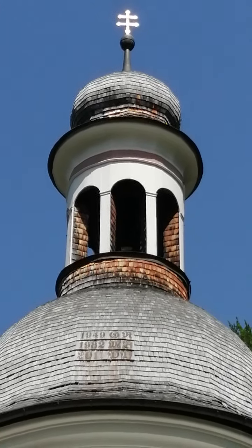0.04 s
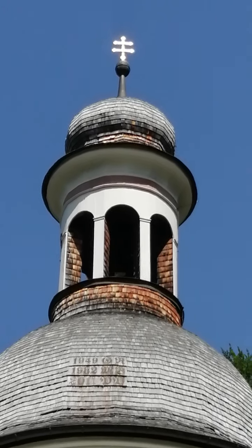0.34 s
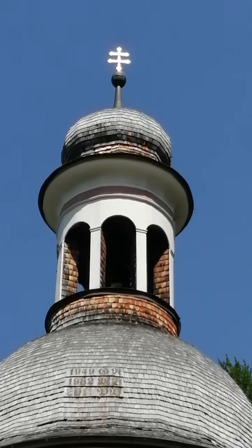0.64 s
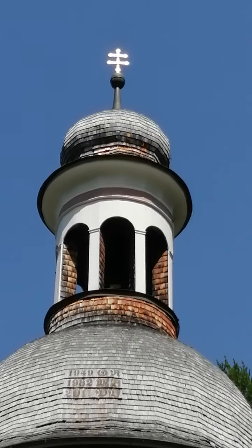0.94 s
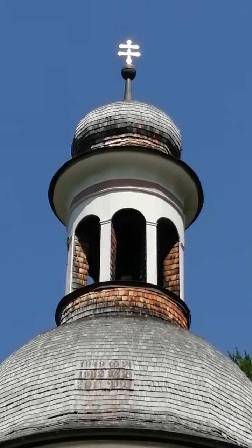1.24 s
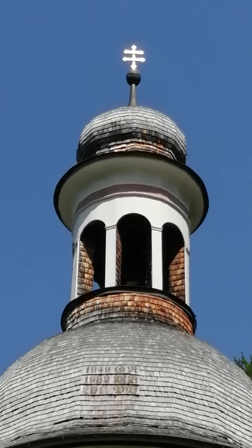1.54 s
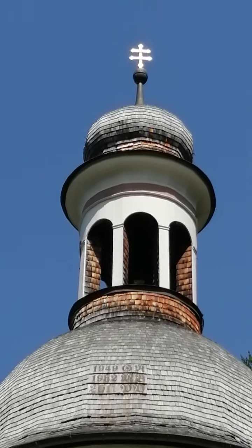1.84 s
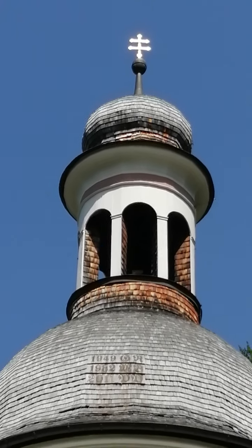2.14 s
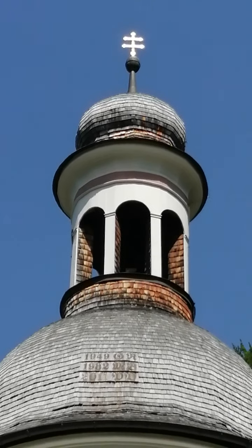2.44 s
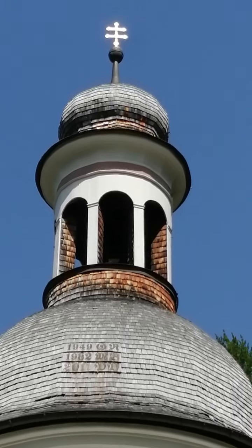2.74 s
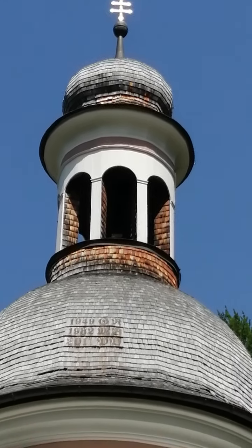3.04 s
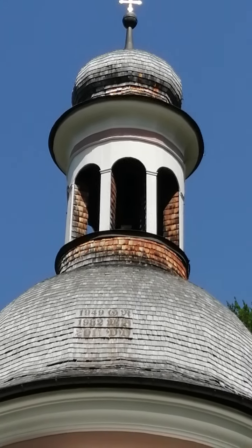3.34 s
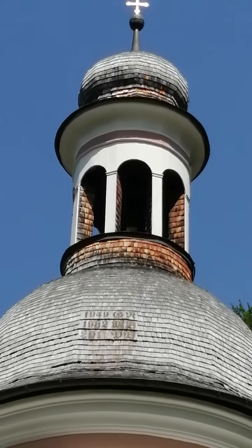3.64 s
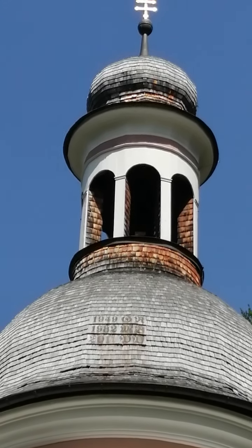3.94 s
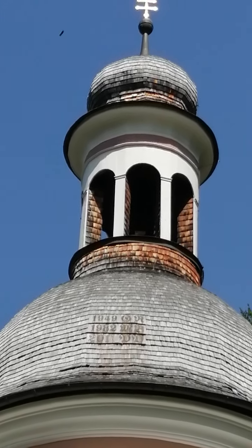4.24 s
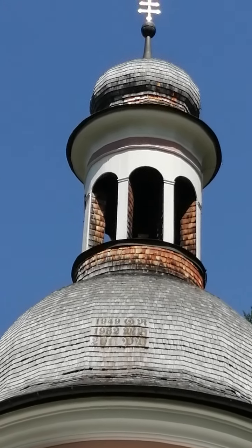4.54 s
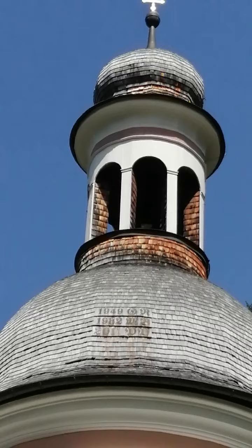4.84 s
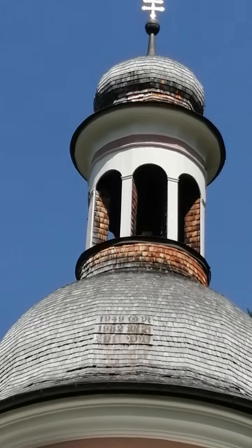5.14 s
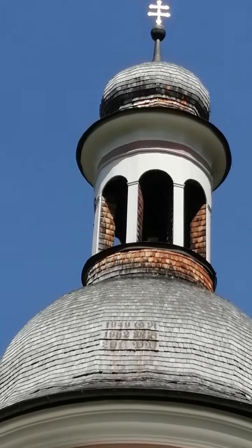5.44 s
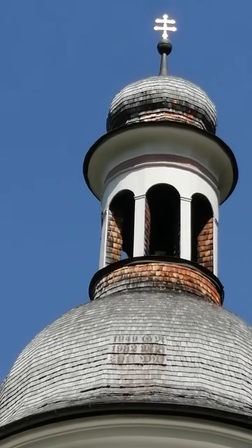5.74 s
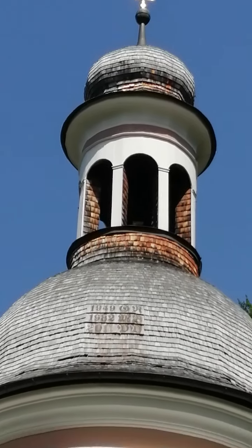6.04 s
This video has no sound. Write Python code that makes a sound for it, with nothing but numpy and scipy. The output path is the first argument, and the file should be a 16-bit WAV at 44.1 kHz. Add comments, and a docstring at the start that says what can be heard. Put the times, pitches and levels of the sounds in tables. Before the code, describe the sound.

A small bronze bell is already ringing at the start, swinging in the open turret of a chapel and heard outdoors from the ground. The clapper strikes at about 0.8, 1.5, 2.4, 3.2, 4.2, 4.9 and 5.9 seconds, in a steady, slightly limping rhythm. Each stroke has a short metallic clank, a bright shimmer that dies quickly and a clang that lasts into the next hit. Alternate strokes are a little duller, and the one at 0.8 seconds is softer. Lower tones hum throughout, swelling and dipping with the swing, while the motion and wall echoes make the ring waver and flutter. The mounting ticks very faintly near 0.1, 1.8 and 5.3 seconds. A faint rumble and hiss of open air lies underneath. The bell is still ringing at the end, around 6 seconds.

```python
"""A small bronze bell is already ringing, swinging in the open lantern of a chapel, heard from the ground.
The clapper hits at both ends of the swing: a clank, a bright shimmer and a clang over three lasting low partials.
As the bell moves, its partials bend in pitch and sweep their lobes past the listener, and echoes from
the lantern walls, each bent by another amount, make them flutter.
The hanging ticks now and then, and the faint air of a quiet day lies underneath."""
import sys
import numpy as np
from scipy import signal
from scipy.fft import rfft, irfft, next_fast_len
from scipy.io import wavfile
from scipy.ndimage import uniform_filter1d

SR = 44100
rng = np.random.default_rng(int(sys.argv[2]) if len(sys.argv) > 2 else 0)


def unload_audio(sound):
    """Save the sound as a 16-bit wav file, at the path given as the first command line argument."""
    columns = np.transpose(np.atleast_2d(sound))
    # keep every value between -1 and 1, then stretch to whole-number steps
    steps = np.round(np.clip(columns, -1, 1) * 32767)
    wavfile.write(sys.argv[1], SR, steps.astype(np.int16))


N = 268569
LEAD_S, SPAN_S, CONTROL_HZ = .2, 6.4, 1000  # the partials' envelopes: pre-roll, length, sample rate


def undb(db):
    """Decibels to gain."""
    return 10 ** (np.asarray(db) / 20)


def at_hz(hz, table, column=1):
    """One column of a table, read on a log-frequency axis."""
    table = np.array(table)
    return np.interp(np.log(np.maximum(hz, 1)), np.log(table[:, 0]), table[:, column])


def noise(density_db, size, apart_hz):
    """Stereo noise shaped by a curve in dB per Hz; the image widens towards the treble."""
    hz = np.fft.rfftfreq(size, 1 / SR)
    mid, side = rfft(rng.standard_normal((2, size))) * undb(density_db(hz)) * np.sqrt(SR / 2)
    side = side * np.clip(np.sqrt(hz / apart_hz), .22, .75)
    return irfft([mid + side, mid - side], size)


def add(out, start_s, sound):
    """Mix a sound in from start_s."""
    start = int(start_s * SR)
    lo, hi = max(start, 0), min(start + sound.shape[-1], N)
    if hi > lo:
        out[:, lo:hi] += sound[:, lo - start:hi - start]


def ears(db, lead=0):
    """Pan as complex gains: the left ear is db louder and lead radians ahead."""
    sign = np.array([[1], [-1]])
    gains = undb(sign * db / 2) * np.exp(1j * sign * lead / 2)
    return gains / abs(gains.mean())


def tones(voices):
    """Sum of sines from (Hz, complex envelope per ear): each envelope's spectrum moves up to its pitch."""
    size = round(SPAN_S * SR)
    spectrum = np.zeros((2, size // 2 + 1), complex)
    for hz, envelope in voices:
        count = envelope.shape[1]
        bins = round(hz * SPAN_S) + np.arange(count) - count // 2
        sidebands = np.fft.fftshift(np.fft.fft(envelope), axes=1) * size / count / np.sqrt(2)
        spectrum[:, bins[bins > 0]] += sidebands[:, bins > 0]
    return irfft(spectrum, size)[:, round(LEAD_S * SR):][:, :N]


# The bed of open air. Each row: frequency in Hz, level in dB per Hz.
AIR_SPECTRUM = [(20, -87), (60, -77), (100, -81), (140, -89), (300, -86), (700, -88), (1200, -92),
                (2500, -102), (4000, -113), (7300, -109), (8600, -122), (15000, -124)]


def air():
    """Faint outdoor rumble and hiss."""
    return noise(lambda hz: at_hz(hz, AIR_SPECTRUM), next_fast_len(N), apart_hz=2500)[:, :N]


# Ticks as the bell starts back. Each row: start in seconds, level in dB.
HANGING_TICKS = [(.11, -52), (1.83, -52), (5.305, -53)]


def hanging_ticks(t60=.12, top_hz=7000, size=8192):
    """Small dry knocks from the bell's hanging."""
    out = np.zeros((2, N))
    fade_db = -60 * np.arange(size) / SR / t60
    for start_s, db in HANGING_TICKS:
        knock = noise(lambda hz: -6 * (hz / top_hz) ** 4 - 9 * np.exp(-hz / 1500), size, apart_hz=3000)
        add(out, start_s, knock / knock.std() * undb(db + fade_db))
    return out


# The pace of the swing. Each entry: a time in seconds when the bell stands at the far end.
FAR_TURNS_S = [-.13, 1.583, 3.298, 5.04, 6.77]


def swing_share(t):
    """How far the bell is through its swing: 0 at the far end, .5 at the near end, 1 back again."""
    return np.interp(t, FAR_TURNS_S, np.arange(len(FAR_TURNS_S))) % 1


def swing(t):
    """Position of the bell: +1 at the far end, -1 at the near end."""
    return np.cos(2 * np.pi * swing_share(t))


def facing(lobes, t):
    """Gain as the mouth turns its lobes past the listener; a change of sign passes through silence."""
    return np.interp(swing_share(t), *np.transpose(lobes), period=1)


def waver(t, per_s, width=.4):
    """Random complex gain that glides between steps, a little different at each ear."""
    hold = max(int(CONTROL_HZ / per_s), 1)
    step_index = ((t - t[0]) * min(per_s, CONTROL_HZ / 2)).astype(int)
    steps = rng.standard_normal((2, 2, len(t)))[..., step_index]
    real, imag = uniform_filter1d(uniform_filter1d(steps, hold), hold)
    mid, side = (real + 1j * imag) / np.sqrt(np.mean(real ** 2 + imag ** 2))
    return np.array([mid + width * side, mid - width * side])


def lantern_echoes(hz, position, echo_db, reach_m, ear_lag_ms, spread=1.6, count=20):
    """Direct sound plus wall echoes: a partial's complex gain at each ear for each bell position."""
    bend = -2 * np.pi * hz * reach_m * position / 343  # the moving bell shifts the phase, so the pitch
    # each wall sees the bell move at its own speed, and sends its echo from its own direction
    speeds = np.linspace(-.7 * spread, spread, count)
    lag_s = ear_lag_ms / 1000 * rng.standard_normal(count)
    walls = np.exp(2j * np.pi * (rng.random(count) + hz * np.array([lag_s, -lag_s]) / 2))
    echoes = (walls[:, :, None] * np.exp(1j * speeds[:, None] * bend)).sum(axis=1)
    field = np.exp(1j * bend) + undb(echo_db) / np.sqrt(count) * echoes
    power = np.mean(abs(field) ** 2, axis=0)
    return field / np.sqrt(uniform_filter1d(power, size=len(position) // 5))


def paths(hz, t, echo_db, reach_m=.62, ear_lag_ms=.11, sway=.15, sway_s=1.3):
    """Flutter of a partial swung reach_m to either side, heard through lantern and late ground echoes."""
    positions = np.linspace(-1 - sway, 1 + sway, 260)
    field = lantern_echoes(hz, positions, echo_db, reach_m, ear_lag_ms)
    course = swing(t) + sway * np.sin(2 * np.pi * (t / sway_s + rng.random()))  # no two swings alike
    early = np.array([np.interp(course, positions, ear) for ear in field])
    # late echoes from the grounds waver, with a fainter tremble on top; they grow up to 4 kHz
    late = waver(t, per_s=28 * hz / 2000) + undb(-11) * waver(t, per_s=110)
    late_gain = undb(-9.5 + 3.5 * min(np.log2(hz / 2000), 1))
    return (early + late_gain * late) / np.hypot(1, late_gain)


def bluntness(hz, stroke_s, shelf_db=-5, shelf_hz=10500):
    """Treble shelf in dB: at the far end of the swing the clapper lands on a blunter face."""
    return shelf_db * (swing(stroke_s) > 0) / (1 + (shelf_hz / hz) ** 12)


# The clapper's strokes. Each row: start in seconds, ring strength in dB, ring tilt in dB per octave,
# clank strength in dB, clank tilt above 2 kHz in dB per octave.
CLAPPER_STROKES = [(-1, -2, 0, 0, 0), (-.2, .8, .4, 0, 0), (.849, -3, -4.5, -1, -4),
                   (1.5135, 1.5, -1, -2, -2), (2.428, -.7, .2, -.7, .3), (3.223, 1.3, -.9, -1, -2),
                   (4.18, -.3, 0, 1, .6), (4.945, 1.8, -.3, -.5, -1.3), (5.889, -1, -.2, 1, .6)]


def ringing(hz, t60, t, rise_s=.007):
    """Envelope of one mode: each stroke adds energy, with its own brightness, and the energy drains."""
    stroke_s, db, tilt_db, *_ = np.transpose(CLAPPER_STROKES)
    decay_per_s = 2 * np.log(1000) / t60
    power = undb(db + tilt_db * np.log2(hz / 1000) + bluntness(hz, stroke_s)) ** 2
    start_s = np.maximum(stroke_s, t[0])  # earlier strokes come in already faded
    power = power * np.exp(-decay_per_s * (start_s - stroke_s))
    blows = np.bincount(np.searchsorted(t, start_s), power, len(t))
    energy = signal.lfilter([1], [1, -np.exp(-decay_per_s / CONTROL_HZ)], blows)
    smooth = np.exp(-1 / (rise_s * CONTROL_HZ))
    return signal.lfilter([1 - smooth], [1, -smooth], np.sqrt(energy))


# The clank's colour. Each row: frequency in Hz, base level in dB per Hz, 60 dB decay in seconds.
CLANK_SPECTRUM = [(60, -80, .4), (150, -74, .5), (400, -78, .4), (800, -70, .3), (1400, -61, .27),
                  (2500, -68, .27), (5000, -72, .26), (7300, -73, .26), (8800, -85, .13), (15000, -98, .11)]


def clank(crack_db=7, crack_s=.009, rise_s=.002, size=16384, bands=10):
    """Iron meets bronze: a short crack, then a wash that dies in the lantern."""
    out, age = np.zeros((2, N)), np.arange(size) / SR
    log_centres, step = np.linspace(np.log(60), np.log(15000), bands, retstep=True)
    log_hz = np.log(np.maximum(np.fft.rfftfreq(size, 1 / SR), 1))
    attack = (1 + undb(crack_db) * np.exp(-age / crack_s)) * (1 - np.exp(-age / rise_s))
    for start_s, _, _, db, tilt_db in CLAPPER_STROKES:
        burst = rfft(noise(lambda hz: at_hz(hz, CLANK_SPECTRUM), size, apart_hz=3500))
        for hz in np.exp(log_centres):
            band = irfft(burst * np.maximum(1 - abs(log_hz - np.log(hz)) / step, 0))
            fade = np.exp(-np.log(1000) * age / at_hz(hz, CLANK_SPECTRUM, column=2))
            gain = undb(db + tilt_db * np.log2(max(hz / 2000, 1)) + bluntness(hz, start_s))
            add(out, start_s, band * attack * fade * gain)
    return out


# The sheen on top. Each row: frequency in Hz, base level of one mode in dB, 60 dB decay in seconds.
SHIMMER_SPECTRUM = [(3500, -63, .9), (4500, -57, .8), (6000, -54, .55), (7300, -50, .65), (8000, -56, .5),
                    (9000, -61, .5), (11000, -68, .42), (15000, -77, .35)]


def shimmer(t, scatter_db=6, count=64):
    """A crowd of faint, closely spaced high modes that die quickly after each stroke."""
    for hz in np.linspace(3900, 14500, count) + rng.uniform(-70, 70, count):
        level = undb(at_hz(hz, SHIMMER_SPECTRUM) + scatter_db * rng.uniform(-1, 1))
        ring = ringing(hz, at_hz(hz, SHIMMER_SPECTRUM, column=2), t)
        lean_left = ears(db=12 * np.exp(-((hz - 8800) / 2200) ** 2))
        yield hz, level * ring * paths(hz, t, echo_db=2.5) * lean_left


# The clang. Each row: pitch in Hz, base level in dB, 60 dB decay in seconds, lobe turn from
# mid-swing to either end in radians, lobe aim in radians, left minus right in dB.
CLANG_PARTIALS = [(980, -50, 3.4, 1.7, 0.3, -3), (1608, -36, 2.0, 1.6, -0.3, -5),
                  (1650, -42, 1.3, 1.8, -0.5, -3), (2061, -36, 2.7, 1.8, -0.1, -5),
                  (2196, -52, 0.7, 2.2, 1.1, 1), (2298, -37, 2.0, 1.7, 2.3, -4),
                  (2402, -48, 1.8, 0.9, 0.7, -6), (2618, -33, 3.3, 1.0, 0.1, -1),
                  (2675, -45, 1.9, 1.0, -0.1, -2), (2789, -37, 1.7, 1.3, -0.3, -2),
                  (2863, -37, 0.7, 2.7, 1.4, -7), (2941, -53, 1.6, 3.0, 1.7, -3),
                  (3014, -48, 0.6, 1.7, -2.2, 0), (3283, -54, 1.3, 1.9, -0.2, 3),
                  (3380, -33, 2.4, 2.1, -0.2, 5), (3531, -43, 0.9, 0.4, 1.9, -8),
                  (3585, -47, 0.8, 1.1, -1.2, -5), (3660, -49, 0.9, 1.5, -0.2, -1),
                  (3746, -51, 0.8, 1.1, -1.1, 1), (4026, -49, 1.0, 2.8, -1.5, -3),
                  (4178, -36, 1.7, 0.8, -0.3, -3), (4983, -34, 1.7, 0.8, -0.2, -5),
                  (5211, -47, 0.7, 1.5, 0.1, -1), (5286, -43, 1.1, 0.3, 1.4, 0),
                  (5775, -33, 0.6, 1.0, -0.2, 0), (6560, -33, 1.0, 1.9, -0.1, -2),
                  (7110, -38, 0.7, 2.8, 1.6, 3), (7330, -38, 0.9, 0.9, 0.1, 8)]


def upper_partials(t, lobe_fill=.2, lobe_lead_s=.035, opposed_hz=3380, opposed_db=3.3):
    """The bronze clangs; the shorter the wave, the more it reaches the ground by way of the walls."""
    for hz, db, t60, turn, aim, pan_db in CLANG_PARTIALS:
        lobes = np.sqrt(lobe_fill + np.cos(turn * swing(t + lobe_lead_s) - aim) ** 2)
        field = paths(hz, t, echo_db=1 + 2 * np.log2(hz / 2000), ear_lag_ms=.09)
        if hz == opposed_hz:  # this one reaches the two ears in opposite phase, and louder
            field = field * undb(opposed_db) * np.array([[1], [-1]])
        yield hz, undb(db) * ringing(hz, t60, t) * lobes * field * ears(pan_db)


# Level rides of the three low partials. Each row: time in seconds, level in dB before the lobes.
HUM_RIDE = [(0.0, -28), (0.55, -31), (0.84, -33), (1.27, -35), (1.76, -27), (2.44, -32), (2.78, -27),
            (3.05, -47), (3.32, -28), (4.32, -32), (4.51, -45), (4.68, -25), (5.33, -28), (5.66, -36),
            (5.8, -48), (6.07, -28)]
PRIME_RIDE = [(0.0, -35), (0.42, -30), (1.05, -40), (3.15, -36), (3.36, -46), (4.83, -37), (5.04, -46),
              (6.09, -40)]
TIERCE_RIDE = [(.09, -36.5), (.15, -27.5), (.82, -35), (1.5, -30.3), (2.5, -29.4), (3.2, -29.6),
               (4.14, -28.3), (4.19, -36), (5.35, -36), (6.09, -32)]
# Their lobes, the same on every swing. Each row: share of the swing from 0 to 1, signed gain.
HUM_SWEEP = [(0.124, 0.73), (0.252, -0.22), (0.354, -0.61), (0.511, -0.13), (0.757, -0.22), (0.851, 0.51)]
PRIME_SWEEP = [(.28, .65), (.48, .37), (.58, .42), (.68, 1.05), (.78, .75)]
TIERCE_SWEEP = [(0.094, 0.96), (0.137, 0.42), (0.268, 0.37), (0.321, -0.31), (0.4, 0.6), (0.583, 0.76),
                (0.649, -0.26), (0.749, -0.38), (0.798, 0.43), (0.846, 0.36), (0.888, 0.97)]


def low_partials(t, hum_hz=315, prime_hz=559.3, twin_hz=553, twin_db=-4, tierce_hz=731):
    """Hum, prime and tierce ring through all strokes and swell with the swing; the split prime beats."""
    def swell(ride, lobes):
        return undb(np.interp(t, *np.transpose(ride))) * facing(lobes, t)
    hum = swell(HUM_RIDE, HUM_SWEEP) * ears(db=1)
    tierce = swell(TIERCE_RIDE, TIERCE_SWEEP) * ears(db=-3.5)
    twin = undb(twin_db) * np.exp(2j * np.pi * (twin_hz - prime_hz) * t)
    beating = (1 + twin) / np.hypot(1, undb(twin_db))
    prime = swell(PRIME_RIDE, PRIME_SWEEP) * beating * ears(db=4, lead=.2)
    yield hum_hz, hum * paths(hum_hz, t, echo_db=-14)
    yield tierce_hz, tierce * paths(tierce_hz, t, echo_db=-14, reach_m=.31)
    yield prime_hz, prime * paths(prime_hz, t, echo_db=-16, reach_m=.31)


# The strike note's lobes. Each row: share of the swing from 0 to 1, gain.
NOMINAL_SWEEP = [(0.08, 0.79), (0.11, 0.53), (0.32, 0.84), (0.39, 0.28), (0.5, 0.59), (0.59, 0.77),
                 (0.69, 0.95), (0.81, 0.39)]
FIFTH_SWEEP = [(0.02, 0.7), (0.09, 0.29), (0.24, 0.93), (0.29, 0.67), (0.33, 0.31), (0.52, 0.24),
               (0.63, 0.24), (0.65, 0.81), (0.74, 0.95), (0.84, 0.24)]


def strike_note(t, nominal_hz=1263, fifth_hz=1903):
    """Nominal and fifth carry the note: they jump at each stroke, fade, and surge as their lobes pass."""
    nominal = undb(-28.2) * ringing(nominal_hz, t60=3.0, t=t) * facing(NOMINAL_SWEEP, t)
    fifth = undb(-20) * ringing(fifth_hz, t60=4.1, t=t) * facing(FIFTH_SWEEP, t)
    yield nominal_hz, nominal * ears(db=7, lead=-1.7) * paths(nominal_hz, t, echo_db=-4)
    yield fifth_hz, fifth * ears(db=-5, lead=.3) * paths(fifth_hz, t, echo_db=-5)


def scene():
    """The bell, its hanging and the air around the chapel."""
    t = np.arange(round(SPAN_S * CONTROL_HZ)) / CONTROL_HZ - LEAD_S
    bell = tones([*low_partials(t), *strike_note(t), *upper_partials(t), *shimmer(t)])
    return bell + clank() + hanging_ticks() + air()


def record(dry):
    """A steep low-pass at 15350 Hz cuts the very top."""
    return signal.sosfilt(signal.ellip(8, .2, 70, 15350, fs=SR, output="sos"), dry)


dry = scene()
out = record(dry)
unload_audio(out)
```